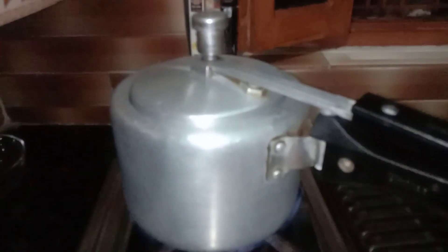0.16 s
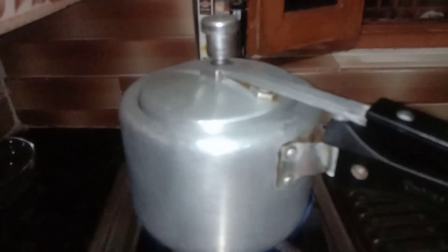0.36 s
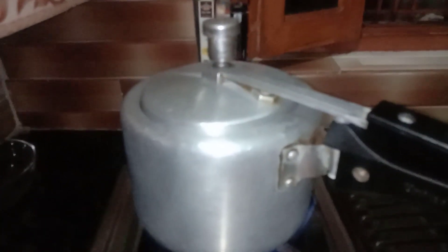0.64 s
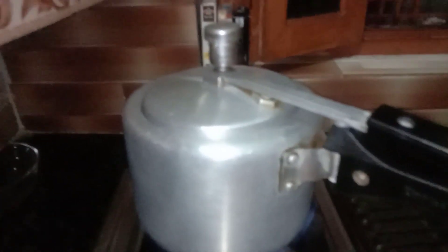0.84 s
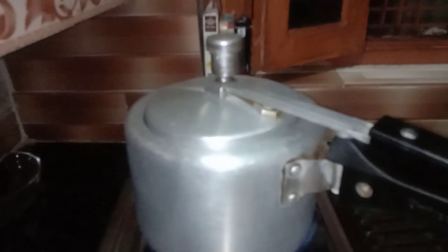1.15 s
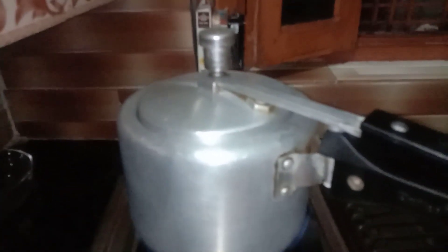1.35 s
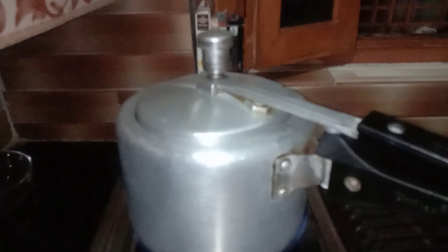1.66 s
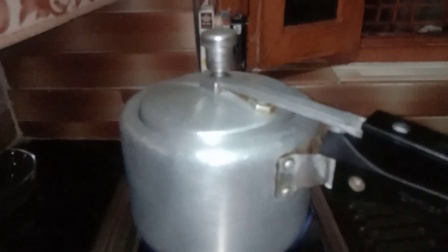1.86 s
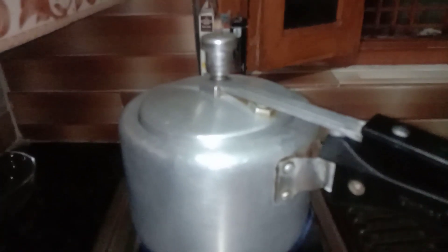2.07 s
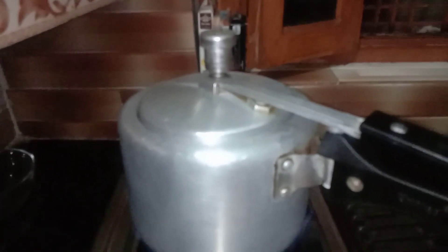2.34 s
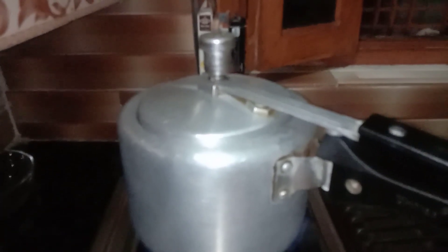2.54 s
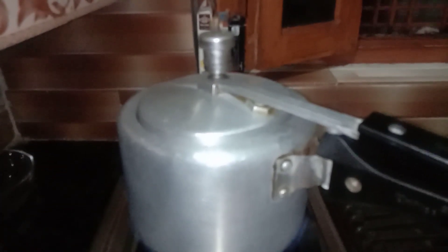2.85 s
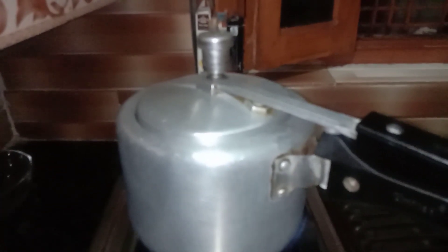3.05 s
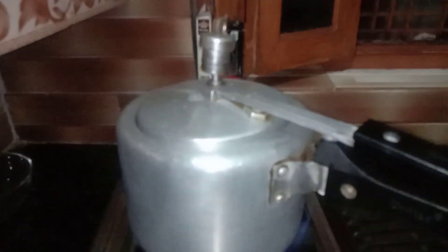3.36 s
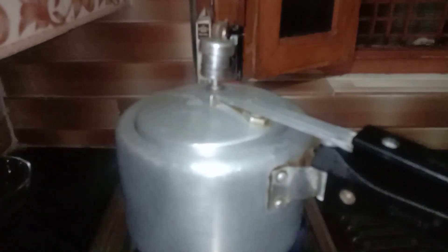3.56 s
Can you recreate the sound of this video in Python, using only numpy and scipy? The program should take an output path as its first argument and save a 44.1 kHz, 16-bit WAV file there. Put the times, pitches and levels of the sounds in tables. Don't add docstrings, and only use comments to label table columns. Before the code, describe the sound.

Pressure cooker steam hisses thin and steady, then bursts into a loud half-second blast and sputters down.

```python
import sys
import numpy as np
from scipy import signal
from scipy.fft import rfft, irfft
from scipy.io import wavfile
from scipy.ndimage import uniform_filter1d

SR = 44100
rng = np.random.default_rng(int(sys.argv[2]) if len(sys.argv) > 2 else 0)


def to_linear_factor(level_db):
    exponent = np.asarray(level_db, float) / 20
    return 10 ** exponent


def store_pcm(level_fs):
    pcm = np.round(np.clip(level_fs, -1, 1) * 32767).astype(np.int16)
    wavfile.write(sys.argv[1], SR, np.atleast_2d(pcm).T)


N = 163170
T = np.arange(N) / SR
F = np.maximum(np.fft.rfftfreq(N, 1 / SR), 1)

# freq_hz, level_db
FLAME_COLOUR = [(15, -45), (25, -7), (43, -19), (97, -1.5), (281, -15), (389, -15.5), (500, -9.5),
                (650, -17), (1100, -120)]
# freq_hz, level_db
PUFF_COLOUR = [(35, -25), (60, -24), (80, 4.5), (120, 7.5), (155, -15.5), (200, -9), (245, -27), (500, -39)]
# start_s, length_s, level_db
PUFFS = [(0, 0.057, -53), (0.173, 0.021, -34), (0.43, 0.14, -47), (0.62, 0.035, -53), (0.712, 0.1, -47.5),
         (0.84, 0.068, -49), (0.938, 0.055, -41.5), (1.06, 0.086, -45), (1.0, .05, -50),
         (1.156, 0.043, -36.5), (1.196, 0.086, -41), (1.3, 0.06, -53), (1.37, 0.23, -43),
         (1.626, 0.036, -39.5), (1.713, 0.052, -41.5), (1.785, 0.057, -45), (1.865, 0.061, -38.5),
         (1.96, 0.062, -42), (2.072, .055, -36), (2.308, 0.17, -37.5), (2.517, 0.1, -44.5),
         (2.77, 0.045, -61), (2.926, 0.029, -35), (2.936, 0.014, -29), (2.989, 0.023, -30),
         (3.082, 0.028, -42), (3.191, 0.031, -24.5), (3.275, 0.027, -29), (3.535, 0.066, -45),
         (3.667, .04, -44)]
# time_s, level_db, treble_db
LEAK_FLOW = [(0, -25, 2.5), (.07, -24.5, 1), (.3, -24, 1.5), (.75, -25, 1.5), (1.28, -23.5, 1),
             (1.36, -25.5, 2), (1.55, -23, 2.5), (1.75, -25, 2), (2.05, -22.5, 2.5), (2.2, -24.5, 3.5),
             (2.36, -22.5, 3.5), (2.41, -25, -1), (2.46, -23, 3), (2.54, -24.5, 2), (2.8, -23.5, 0.5),
             (3.45, -25, 5.5), (3.6, -21, -6), (3.7, -32, -9)]
# freq_hz, level_db
LEAK_COLOUR = [(200, -44), (400, -42.5), (1050, -31), (3500, -21), (5000, -12.5), (5600, -4), (8000, -7.5),
               (8600, -14.5), (13700, -28.5)]
# time_s, hiss_db
SETTLE = [
    (3.41, -42),
    (3.44, -32),
    (3.46, -27),
    (3.485, -28),
    (3.525, -23),
    (3.572, -28),
    (3.582, -38),
    (3.6, -31),
    (3.66, -40),
]
# freq_hz, level_db
HISS_COLOUR = [(260, -37), (450, -17.5), (1200, -12), (3900, -9), (5600, -9), (7800, -18), (9000, -12),
               (13700, -39)]
# start_s, length_s, level_db
SPURTS = [(3.456, .012, -29), (3.498, .008, -26), (3.512, .012, -26), (3.529, .006, -21),
          (3.546, .006, -21), (3.566, .007, -24), (3.587, .008, -18), (3.599, .02, -21), (3.621, .009, -22),
          (3.634, .007, -26), (3.645, .006, -31)]
# freq_hz, level_db
SPURT_COLOUR = [(600, -46), (2500, -20), (4200, -13.5), (5700, 4), (6300, -4), (7600, -17), (9000, -15),
                (13700, -26)]
# time_s, jet_db, roar_db
LIFT = [
    (2.841, -58, -66),
    (2.846, -22, -22),
    (2.86, -18.5, -26),
    (2.93, -18.5, -26.5),
    (2.97, -18, -25),
    (3.14, -18.5, -27),
    (3.28, -18.5, -27),
    (3.396, -18.5, -29.5),
    (3.415, -24, -40.5),
    (3.7, -29.5, -60),
]
# freq_hz, level_db
JET_COLOUR = [(2000, -25), (3000, -12.5), (4200, -7), (6000, -4), (7800, -1), (8700, -10), (11500, -10.5),
              (13700, -26)]
# freq_hz, level_db
ROAR_COLOUR = [(30, -39), (65, 1), (90, -2.5), (250, -7.5), (600, -11), (2000, -9), (4000, -13),
               (6000, -20)]
# time_s, depth_db
GUSTS = [(2.924, -23), (2.951, -22), (3.004, -27), (3.09, -19), (3.196, -22), (3.226, -27), (3.259, -25),
         (3.275, -18), (3.296, -20), (3.341, -27)]
# time_s, peak_db
POPS = [(2.851, -19), (2.855, -19), (2.9, -18), (2.92, -7), (2.948, -13), (3.0, -17), (3.082, -17),
        (3.086, -17), (3.108, -18), (3.199, -17), (3.224, -18), (3.259, -18), (3.273, -13), (3.294, -17),
        (3.321, -17), (3.342, -17)]
# freq_hz, width_hz, boost_db (negative is a gap)
RINGS = [(540, 23, -1), (883, 82, 6.5), (740, 71, -2.5), (1090, 95, -7), (1660, 120, 1.5), (4185, 150, 4.5),
         (5080, 136, 8), (5280, 70, -10), (6055, 51, 11), (6660, 300, -3), (7510, 460, 6),
         (8100, 140, -5.5), (8680, 190, -10), (12230, 440, -8), (13300, 410, 5), (14100, 250, 0),
         (14860, 900, 10.5), (15330, 480, 14.5),
         (1800, 200, -5), (2630, 70, -8), (2230, 120, -4), (3350, 100, -8), (3980, 90, -6),
                (4470, 70, 4), (4950, 70, -6), (5540, 90, 5), (5710, 60, 4), (5870, 60, 3), (6200, 60, 4),
                (6385, 60, 4), (7130, 80, 3), (7300, 70, 3)]
# delay_s, level_db
MIRRORS = [
    (.00265, -47),
    (.00375, -25),
    (.0057, -22.5),
]

FLAME_DB, PUFF_DB = -59, -5.0
FLUTTER_DB, QUICK_DB, OWN_DB, PATCHY_DB = .25, 1.0, .9, 1.8
TREBLE_HZ, TREBLE_FLUTTER_RATIO = 9330, 1.6
TOP_HZ, TOP_SLOPE_HZ, LOW_CUT_HZ = 15475, 170, 25
LID_HZ, LID_WIDTH_HZ = 1258, 105
LID_LEAK_DB, LID_ROAR_DB, LID_SETTLE_DB = -29.5, -10, -14.5
SPURT_ATTACK_S, SPURT_RELEASE_S = .002, .004
GUST_WIDTH_S = .0019
POP_WIDTH_S, POP_RECOIL_S, POPS_PER_S, SMALL_POP_DB = .00015, .002, 130, 3.0
JET_DULLS_S, JET_DULL_TIME_S, JET_DULL_DB = 3.45, 0.078, -8
CATCH_S, CATCH_WIDTH_S, CATCH_DB = 3.58, .004, -5
ECHO_DB, ECHO_T60_S = -13, .09


def unit(x):
    return x / np.sqrt(np.mean(x ** 2))


def curve(table, column):
    return np.interp(T, [r[0] for r in table], [r[column] for r in table], left=-120)


def bell(centre_s, width_s, t=T):
    return np.exp(-.5 * ((t - centre_s) / width_s) ** 2)


def resonance(hz, width_hz):
    return 1 / (1 + (2 * (F - hz) / width_hz) ** 2)


def walk(rate_hz):
    hold = int(SR / rate_hz)
    x = np.repeat(rng.standard_normal(N // 20), hold)[:N + hold]
    x = uniform_filter1d(uniform_filter1d(x, hold), hold)[:N]
    return unit(x - uniform_filter1d(x, size=5 * hold))


def turbulence(colour, shake, ring=0.85, treble_db=0):
    c = np.array(colour)
    colour_db = np.interp(np.log(F), np.log(c[:, 0]), c[:, 1], left=-90)
    ring_db = sum(boost_db * resonance(hz, width_hz) for hz, width_hz, boost_db in RINGS)
    noise = rfft(rng.standard_normal(N)) * to_linear_factor(colour_db + ring * ring_db) * (F < TOP_HZ + TOP_SLOPE_HZ)
    noise = noise / np.sqrt(np.mean(irfft(noise, N) ** 2))
    shared_db = FLUTTER_DB * walk(34) + QUICK_DB * walk(55)
    out = 0
    for step in range(20):
        place = np.clip(2 * np.log2(F / 25) - step, -1, 1)
        band = irfft(noise * np.cos(place * np.pi / 2) ** 2, N)
        high = 25 * 2 ** (step / 2) > TREBLE_HZ
        flutter_db = (TREBLE_FLUTTER_RATIO if high else 1) * shared_db + OWN_DB * walk(45)
        if step < 14:
            flutter_db = flutter_db + PATCHY_DB * walk(9)
        tilt_db = max(step - 16, 0) / 2 * treble_db
        out = out + band * to_linear_factor(shake * flutter_db + tilt_db)
    return out


def flame():
    gust = turbulence(PUFF_COLOUR, 0, ring=0)
    gust = unit(gust / (0.79 + uniform_filter1d(np.abs(gust), size=SR // 60)))
    gust = gust * to_linear_factor(1.2 * walk(30))
    swell = 0
    for start_s, length_s, db in PUFFS:
        phase = np.clip((T - start_s + 0.0093) / (length_s + 0.018), 0, 1)
        swell = swell + to_linear_factor(db) * np.sin(np.pi * phase)
    return turbulence(FLAME_COLOUR, 1.0, ring=0) * to_linear_factor(FLAME_DB) + to_linear_factor(PUFF_DB) * swell * gust


def lid():
    mode = unit(irfft(rfft(rng.standard_normal(N)) * resonance(LID_HZ, LID_WIDTH_HZ), N))
    mode = unit(mode / (1 + uniform_filter1d(np.abs(mode), size=SR // 30)))
    drive = to_linear_factor(LID_LEAK_DB + curve(LEAK_FLOW, column=1)) + to_linear_factor(LID_ROAR_DB + curve(LIFT, column=2))
    drive = drive + to_linear_factor(LID_SETTLE_DB + curve(SETTLE + [(5.8, -120)], column=1))
    return mode * to_linear_factor(0.33 * walk(21)) * drive


def gusts():
    out = 0
    for time_s, db in GUSTS:
        dip = ((T - time_s) / GUST_WIDTH_S) ** 2 - 1
        out = out + to_linear_factor(db) * dip * bell(time_s, GUST_WIDTH_S)
    return out


def pops():
    chance = rng.random((2, N))
    size = np.minimum(-np.log(chance[1]), 2)
    train = (chance[0] < POPS_PER_S / SR) * size * to_linear_factor(SMALL_POP_DB + curve(LIFT, column=2))
    for time_s, db in POPS:
        train[int(time_s * SR)] += to_linear_factor(db)
    t = T[:SR // 25] - .02
    recoil = bell(0, POP_RECOIL_S, t) * POP_WIDTH_S / POP_RECOIL_S
    return signal.fftconvolve(train, bell(0, POP_WIDTH_S, t) - recoil, mode="same")


def sputter():
    gate = 0
    for start_s, length_s, db in SPURTS:
        attack = np.clip((T - start_s) / SPURT_ATTACK_S, 0, 1)
        release = np.exp(-np.maximum(T - start_s - length_s, 0) / SPURT_RELEASE_S)
        gate = gate + to_linear_factor(db) * attack * release
    hiss = turbulence(HISS_COLOUR, 0.11, ring=0.89) * to_linear_factor(curve(SETTLE + [(11.0, -120)], column=1))
    return hiss + turbulence(SPURT_COLOUR, 0.44, ring=0.56) * gate


def blast():
    dull_db = JET_DULL_DB * np.clip((T - JET_DULLS_S) / JET_DULL_TIME_S, 0, 1)
    jet = turbulence(JET_COLOUR, 0.61, ring=0.88, treble_db=dull_db) * to_linear_factor(curve(LIFT, column=1))
    roar = turbulence(ROAR_COLOUR, 0.53, ring=0.18) * to_linear_factor(curve(LIFT, column=2))
    return jet + roar


def leak():
    jet = turbulence(LEAK_COLOUR, 0.75, treble_db=curve(LEAK_FLOW, column=2))
    return jet * to_linear_factor(curve(LEAK_FLOW, column=1))


def tiles(x):
    t = T[:SR // 4]
    decay = np.exp(-np.log(1000) * t / ECHO_T60_S)
    tail = unit(rng.standard_normal(len(t)) * decay) / np.sqrt(len(t))
    ripple = 1 + sum(to_linear_factor(db) * np.exp(-2j * np.pi * F * delay_s) for delay_s, db in MIRRORS)
    near = irfft(rfft(x) * ripple, N)
    return near + to_linear_factor(ECHO_DB) * signal.fftconvolve(x, tail)[:N]


def scene():
    catch = to_linear_factor(CATCH_DB * bell(CATCH_S, CATCH_WIDTH_S))
    steam = tiles(catch * (leak() + blast() + sputter()))
    mono = steam + lid() + pops() + gusts() + flame()
    return np.array([mono, mono])


def top_cut(x):
    return signal.sosfilt(signal.butter(12, 16880, fs=SR, output="sos"), x)


def record(dry):
    top_db = -95 * np.clip((F - TOP_HZ) / TOP_SLOPE_HZ, 0, 1.4) ** 1.3
    low_cut = 1 / (1 + (LOW_CUT_HZ / F) ** 2)
    mix = irfft(rfft(dry) * to_linear_factor(top_db) * low_cut, N)
    return top_cut(mix)


dry = scene()
out = record(dry)
store_pcm(out)
```